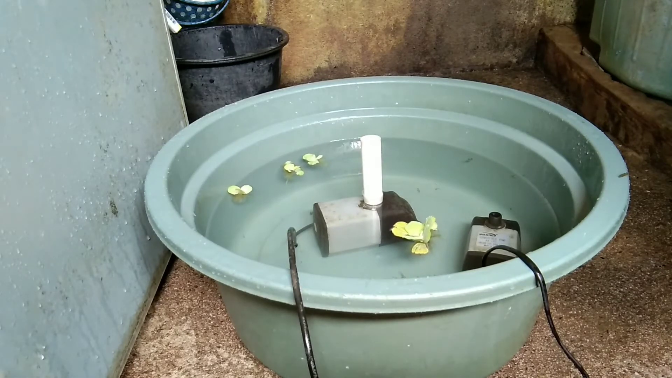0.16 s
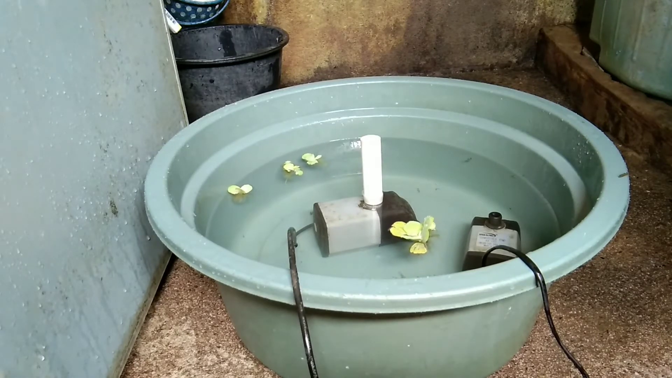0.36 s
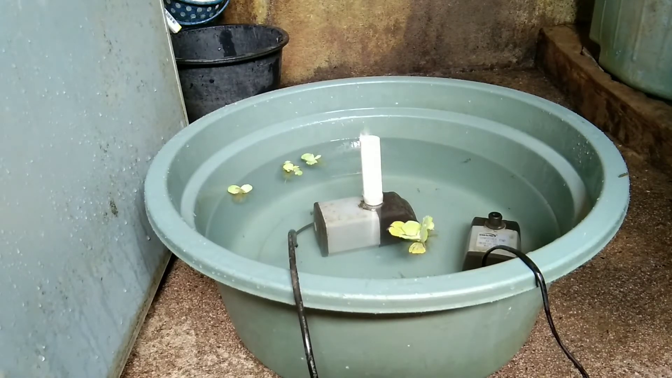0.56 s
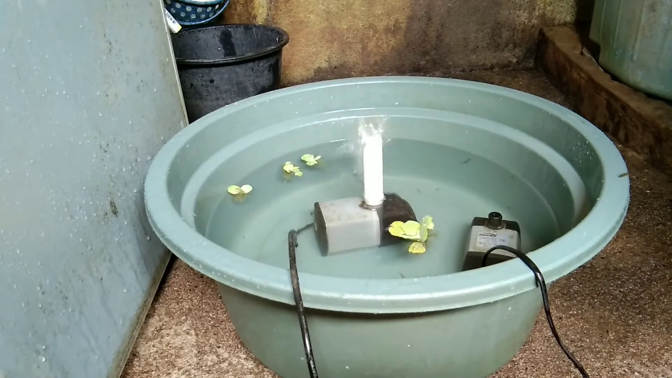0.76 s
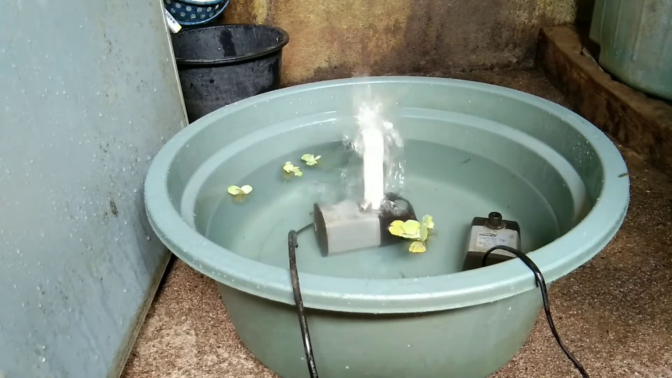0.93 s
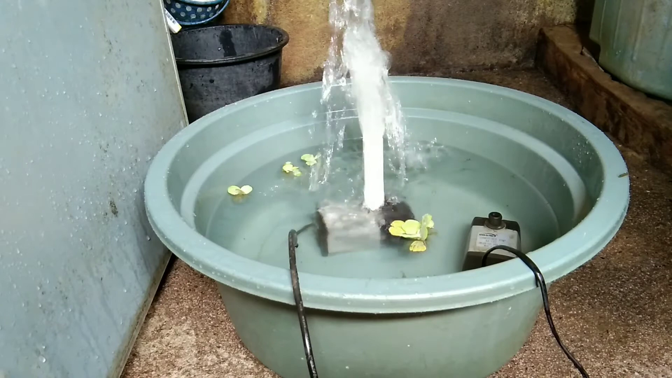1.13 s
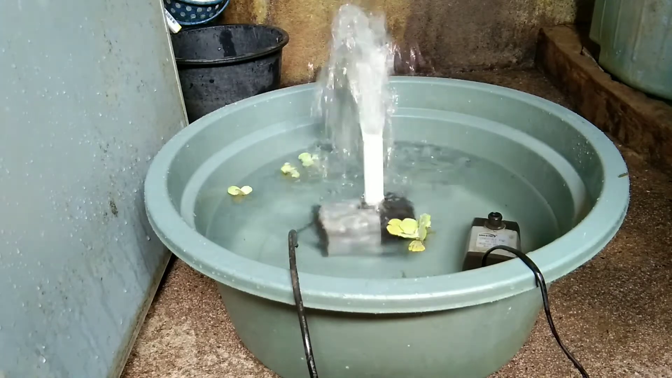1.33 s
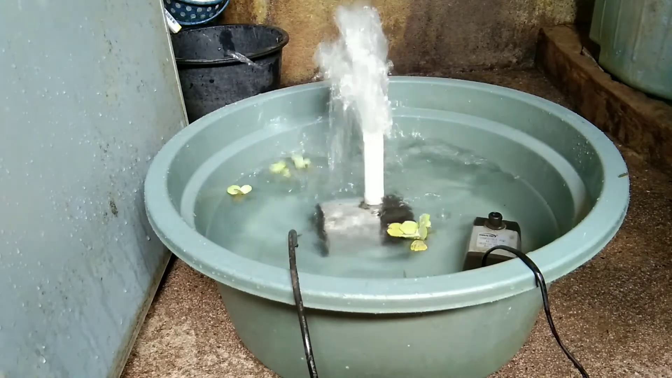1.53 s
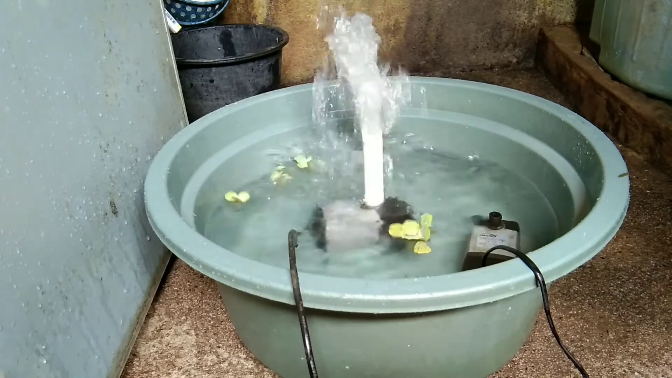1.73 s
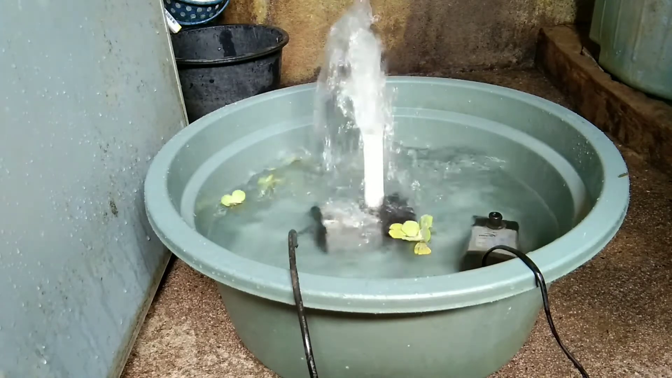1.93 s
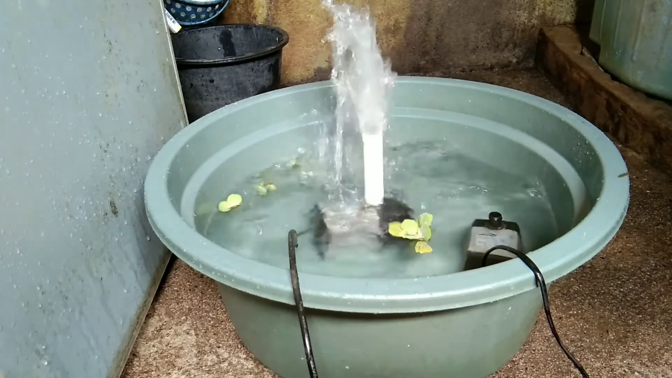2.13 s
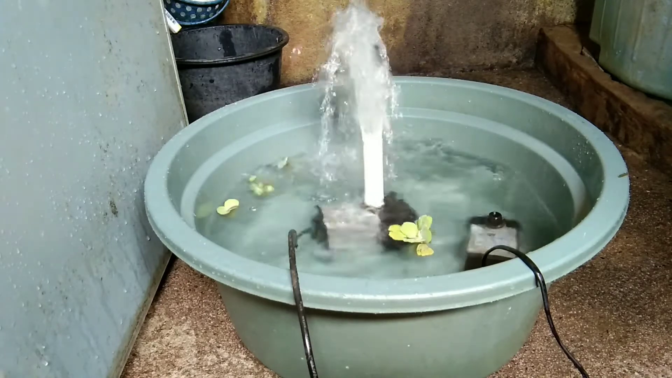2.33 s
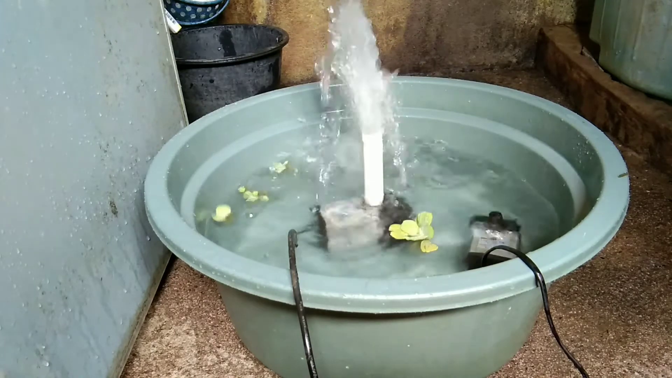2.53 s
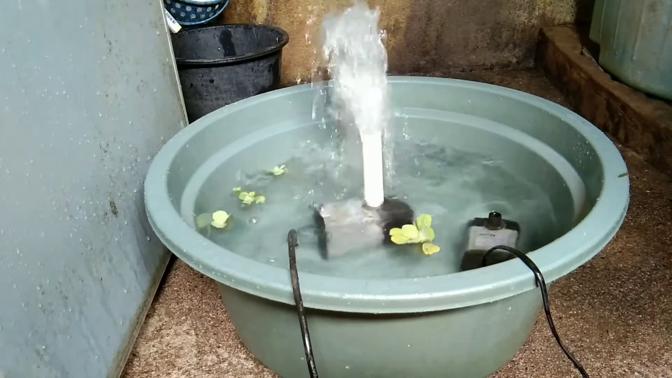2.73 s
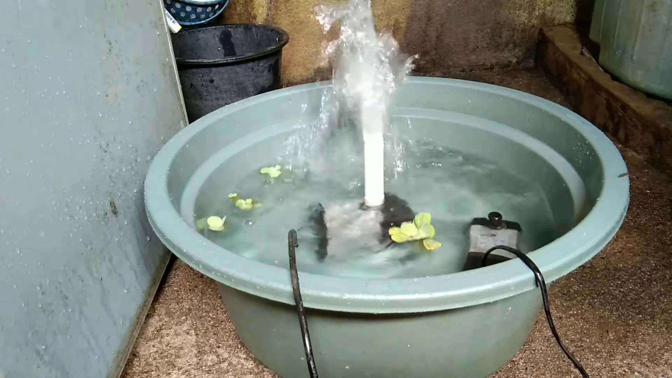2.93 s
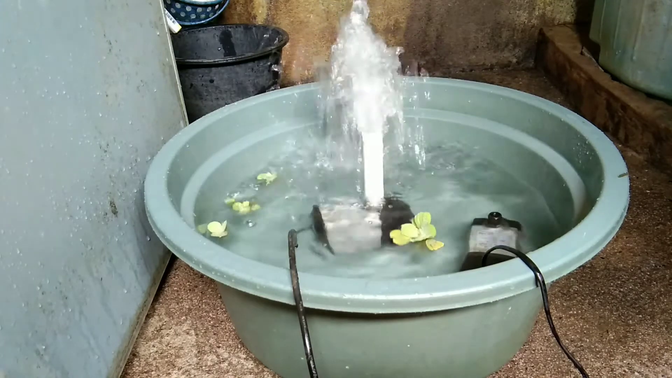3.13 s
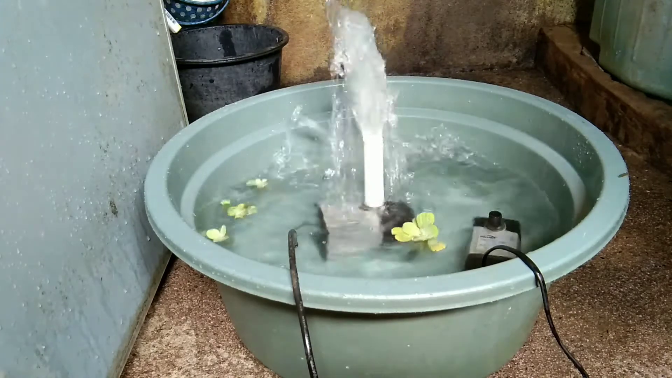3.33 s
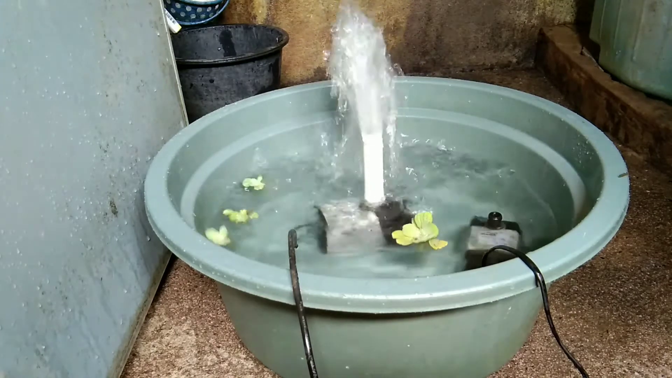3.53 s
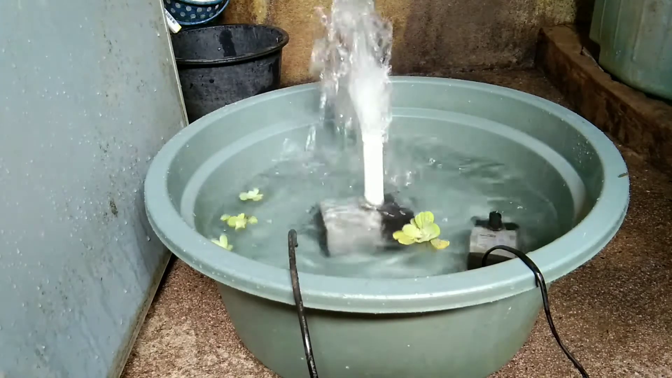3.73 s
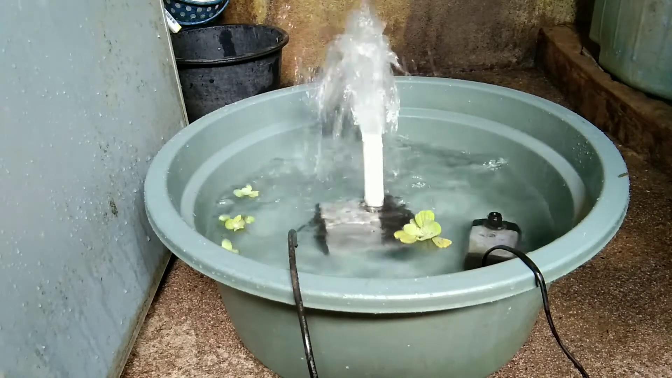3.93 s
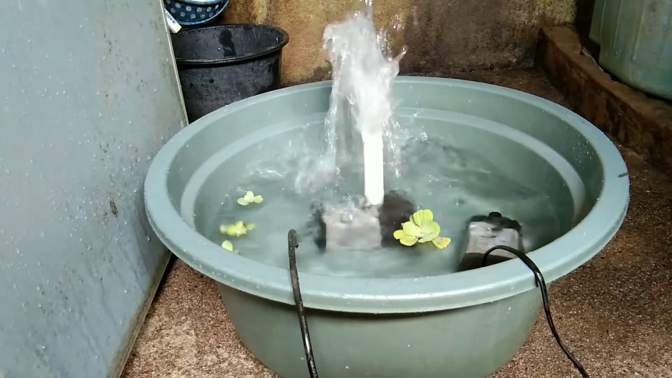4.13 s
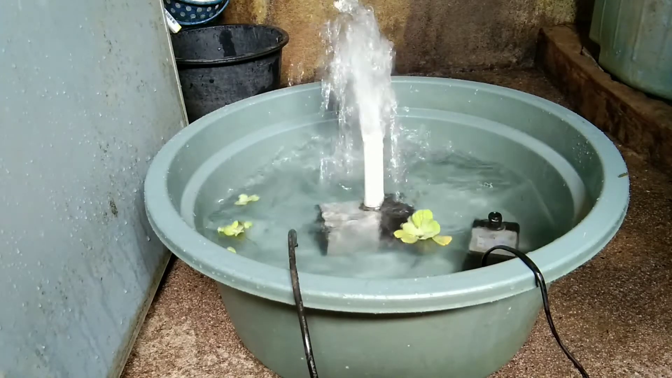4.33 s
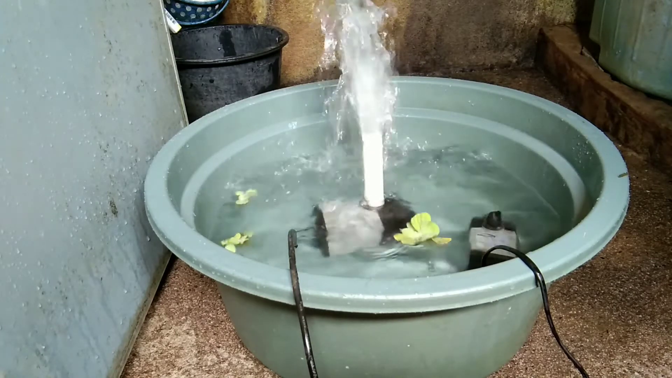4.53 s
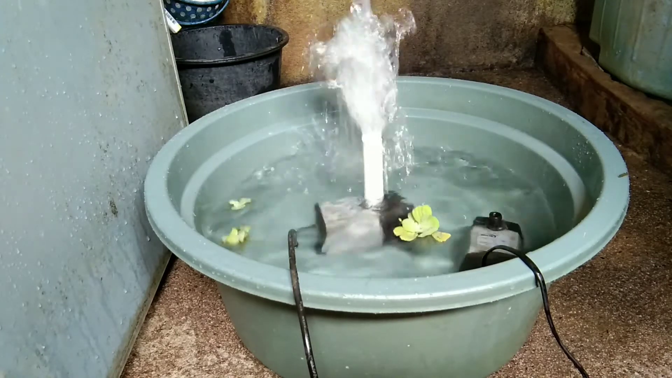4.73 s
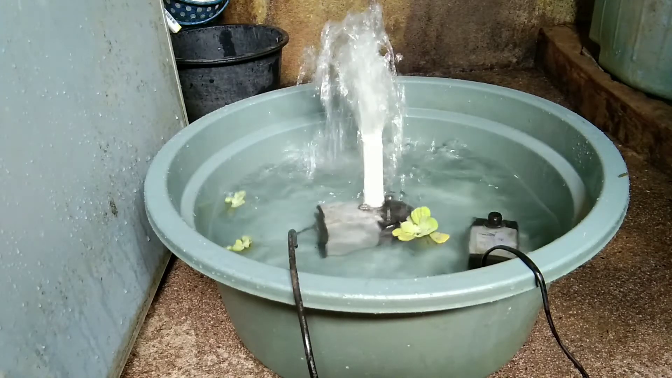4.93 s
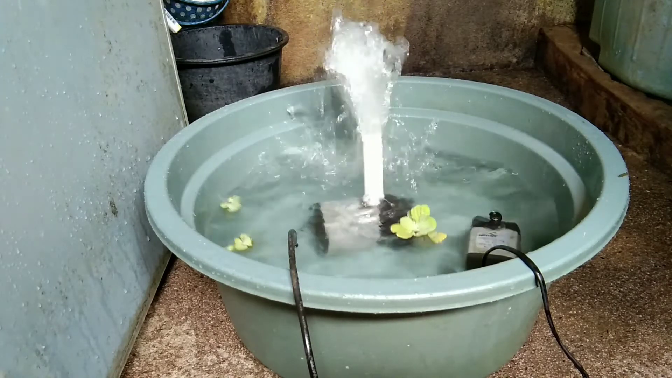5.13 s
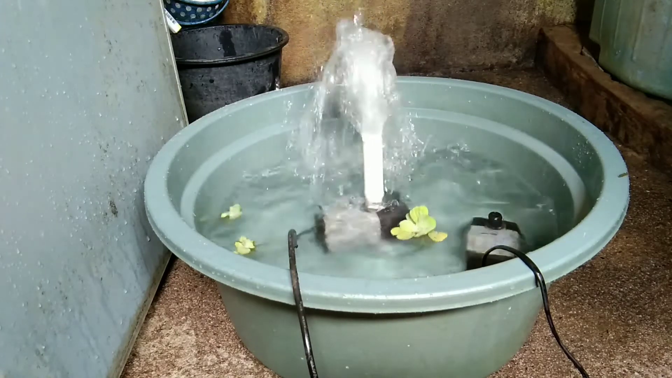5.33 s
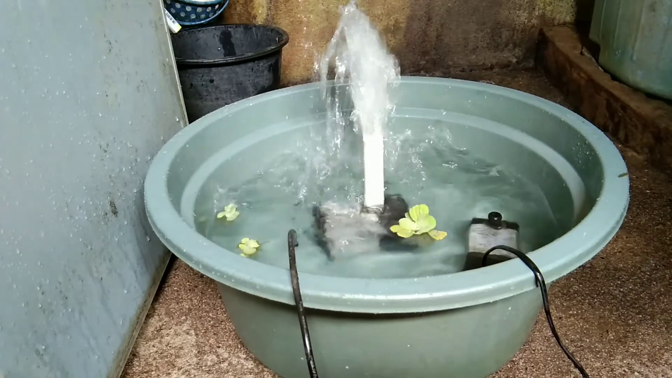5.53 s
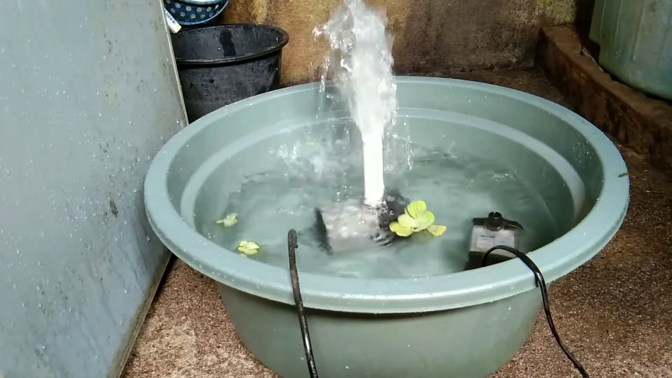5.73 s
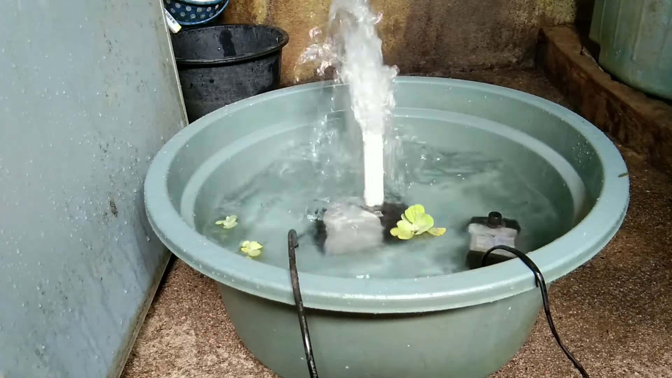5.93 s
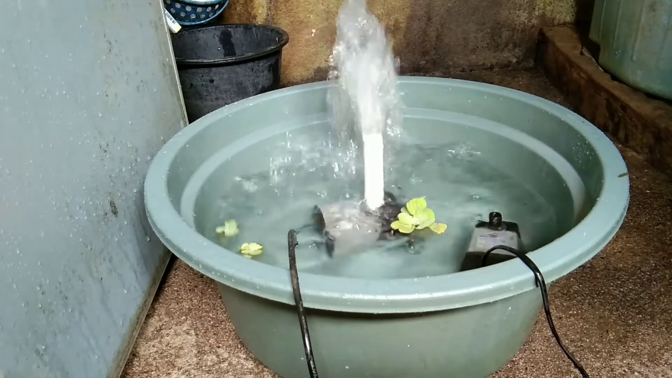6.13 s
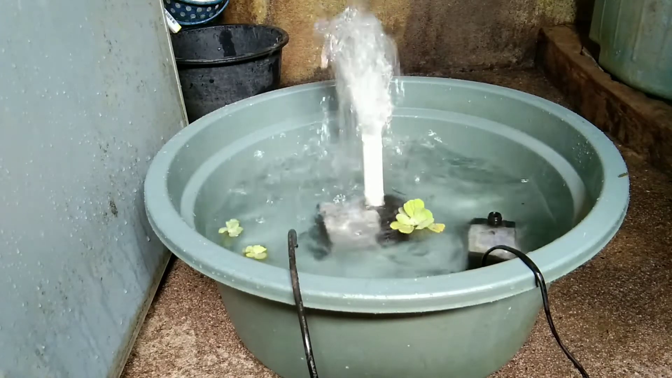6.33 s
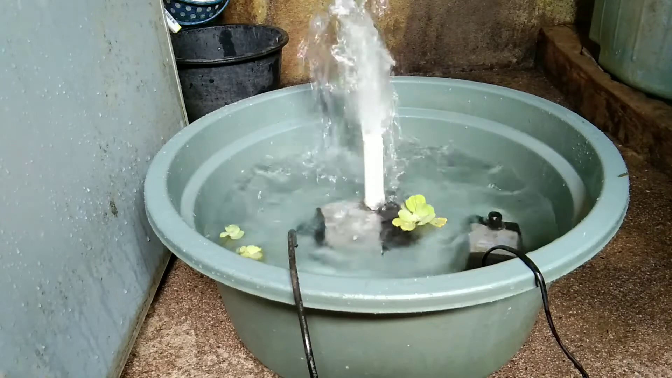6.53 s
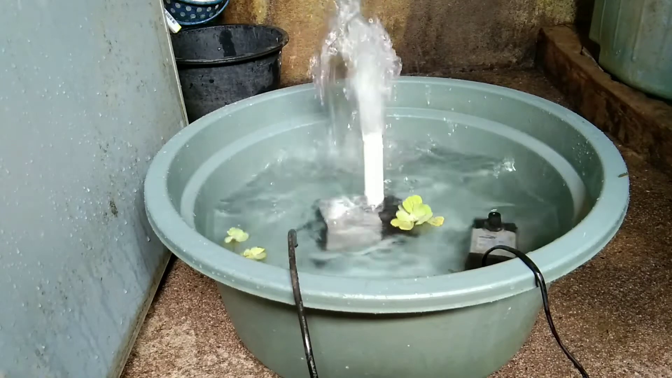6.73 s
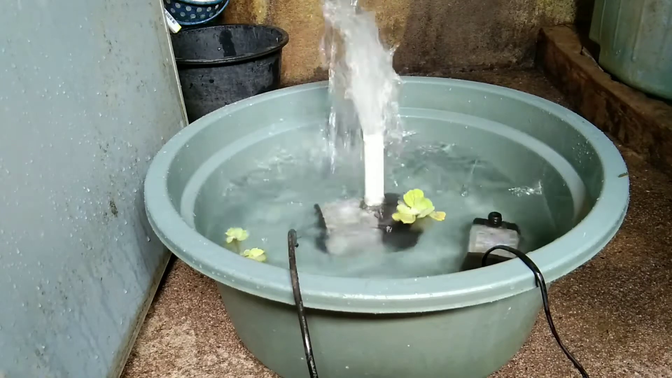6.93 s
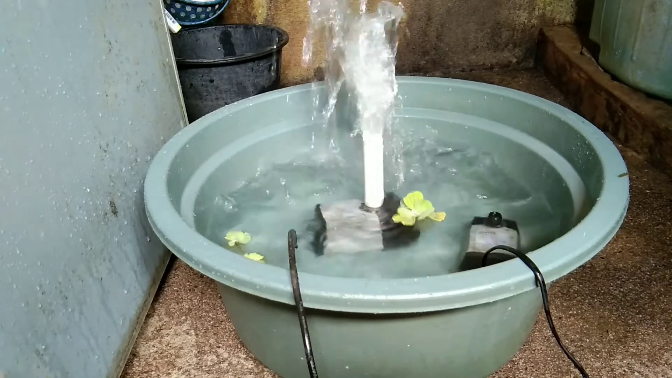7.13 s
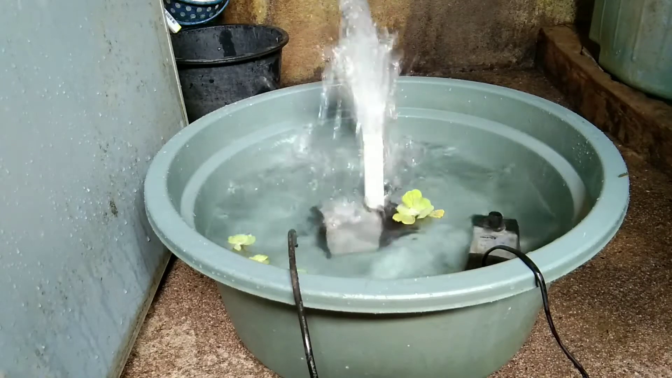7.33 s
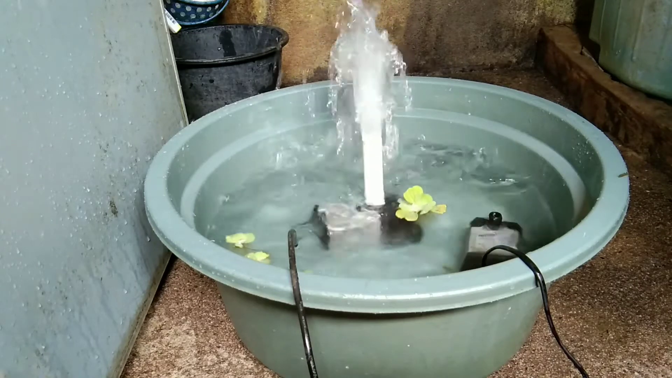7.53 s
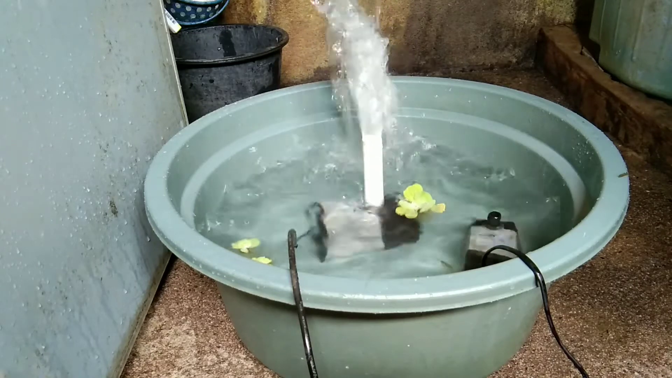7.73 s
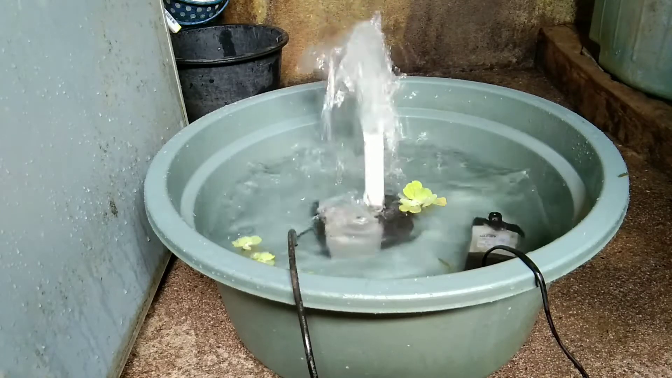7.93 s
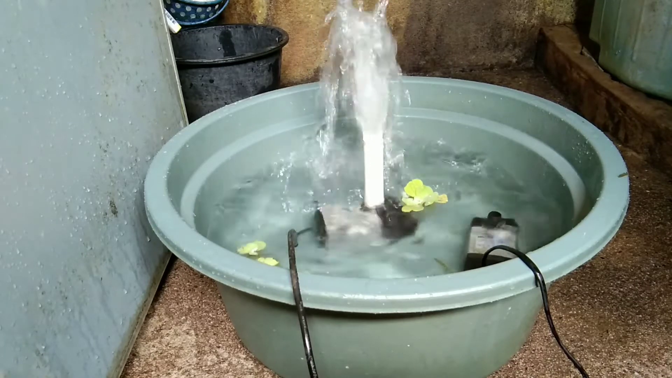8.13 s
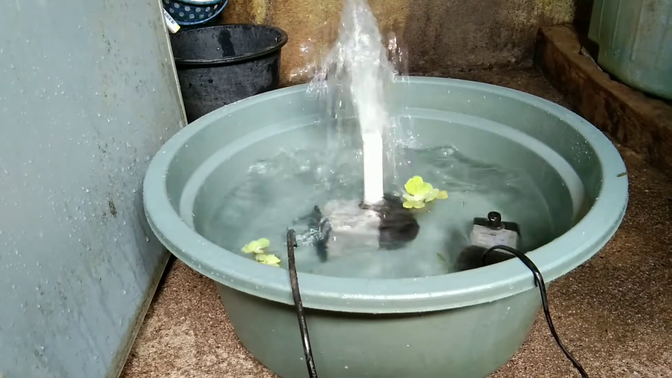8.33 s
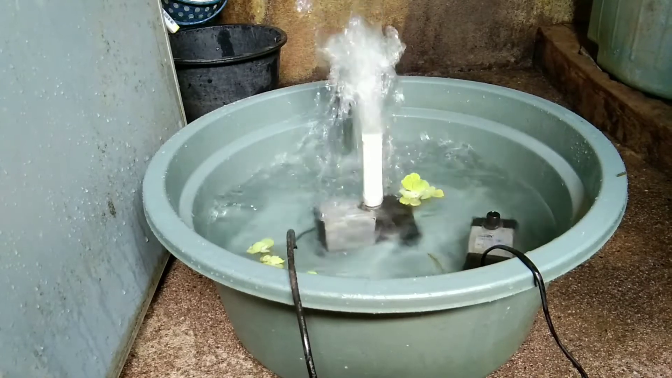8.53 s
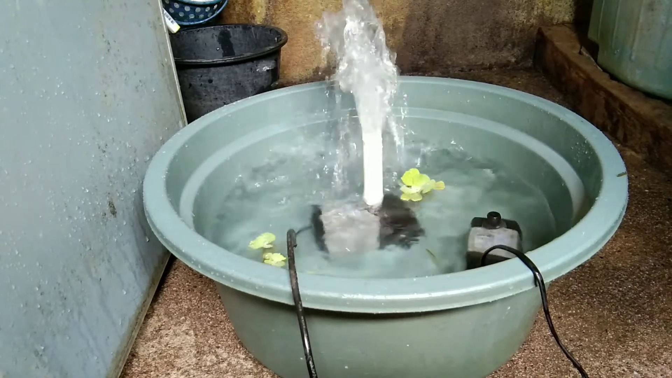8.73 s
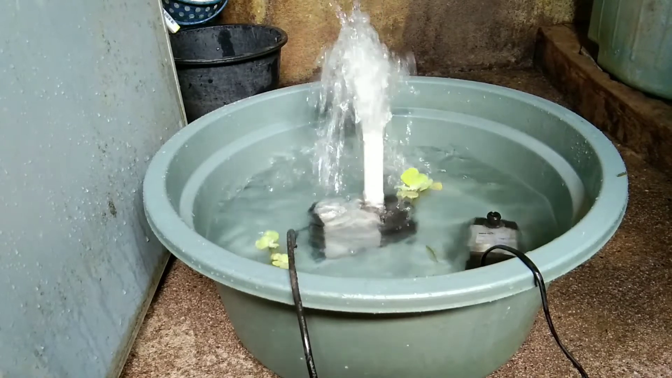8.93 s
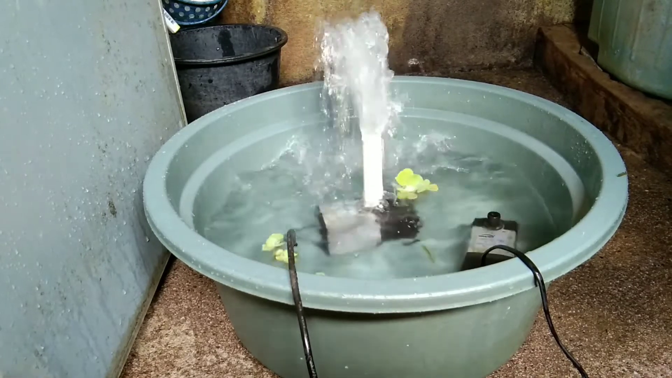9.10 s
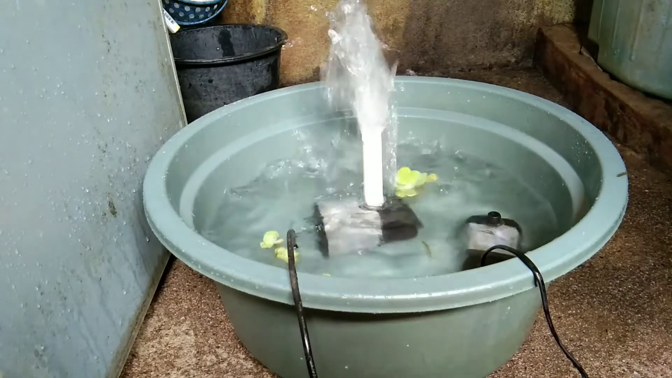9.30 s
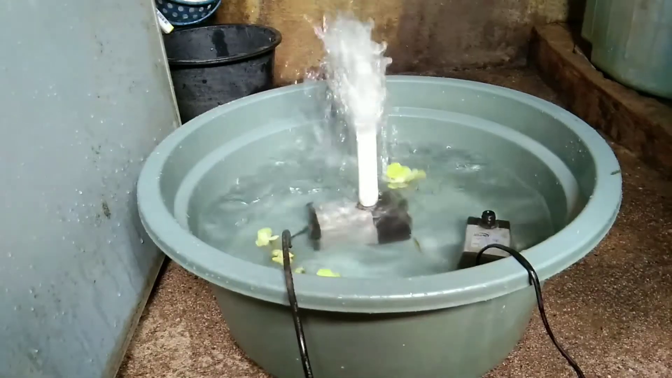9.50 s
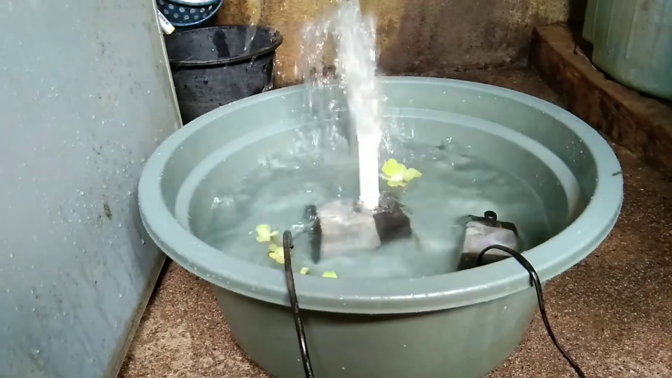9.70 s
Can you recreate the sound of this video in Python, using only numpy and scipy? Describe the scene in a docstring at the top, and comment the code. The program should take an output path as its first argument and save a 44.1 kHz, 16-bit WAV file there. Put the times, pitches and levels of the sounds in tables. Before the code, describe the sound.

After near silence, a small pump rattles and knocks in a plastic tub, then its jet splashes down steadily with splats, spray and bubbling until the end.

```python
"""Water thrown up by a small pump falls back into a plastic tub in clumps: spray, splats and bubbles.
Spray and churn are shaped noise plus swarms of tiny bubble rings; large drops and bubbles are placed singly.
The rotor knocks first, ringing tub and casing; hum and rumble rise under the water in a quiet yard.
Tones are narrow resonances of noise. One narrow-band microphone feeds two equal channels."""
import sys
import numpy as np
from scipy import signal
from scipy.fft import rfft, irfft, next_fast_len
from scipy.io import wavfile
from scipy.ndimage import uniform_filter1d

SR = 44100
rng = np.random.default_rng(int(sys.argv[2]) if len(sys.argv) > 2 else 0)


def dump_mix(stems):
    """Bounce the given channels to the path in sys.argv[1] as a 16-bit WAV at rate SR."""
    frames = np.atleast_2d(stems).T  # one column per channel
    limited = np.clip(frames, -1, 1)  # hard clip at full scale
    pcm = np.round(limited * 32767).astype(np.int16)
    wavfile.write(sys.argv[1], SR, pcm)


N = 430416

# steady rain of the jet: (time [s], spray level [dB], churn level [dB])
RAIN = [(0.86, -51.5, -41), (1.0, -47, -54), (1.1, -39, -57), (1.14, -36.5, -52), (1.3, -38, -61.5),
        (1.4, -38.5, -45), (9.76, -38, -46)]
# clumps of the jet crashing back: (time [s], spray level [dB], churn level [dB], time to fade 10 dB [s])
CLUMPS = [(1.364, -31, -50, 0.4153), (1.504, -24, -34.5, 0.0522), (1.593, -26.5, -50.5, 0.1003),
          (1.695, -29.5, -37, 0.2767), (1.874, -24.5, -40.5, 0.0565), (1.953, -27, -37, 0.2056),
          (2.066, -28, -41, 0.1463), (2.185, -27, -35, 0.1076), (2.295, -32.5, -42.5, 0.236),
          (2.416, -29.5, -45.5, 0.0585), (2.545, -26.5, -33.5, 0.0404), (2.615, -32, -38.5, 0.2361),
          (2.774, -28, -43.5, 0.0827), (2.84, -33, -41.5, 0.2634), (2.926, -31, -36.5, 0.1111),
          (2.984, -28, -38.5, 0.2543), (3.169, -30.5, -49, 0.4079), (3.254, -30.5, -34.5, 0.2142),
          (3.378, -21.5, -46.5, 0.057), (3.561, -33.5, -39, 0.1472), (3.624, -26, -33.5, 0.0181),
          (3.722, -23, -39.5, 0.0538), (3.806, -27.5, -45.5, 0.1753), (4.006, -29, -40.5, 0.43),
          (4.28, -21.5, -34, 0.0371), (4.337, -29.5, -39.5, 0.2797), (4.496, -27.5, -57, 0.0869),
          (4.595, -28, -38.5, 0.0798), (4.697, -29.5, -35.5, 0.1806), (4.844, -32, -37.5, 0.3218),
          (5.019, -24, -34.5, 0.0903), (5.112, -32, -53, 0.9972), (5.354, -32.5, -42, 0.4192),
          (5.5, -38.5, -48.5, 0.162), (5.656, -31.5, -39.0, 0.32), (5.875, -19.5, -40, 0.019),
          (5.977, -30.5, -38.5, 0.1819), (6.116, -30.5, -39.5, 0.2859), (6.341, -32.5, -45, 0.505),
          (6.475, -30, -38, 0.3143), (6.604, -34.5, -38.5, 0.144), (6.75, -34, -51.5, 0.7564),
          (6.852, -32, -34.5, 0.2203), (6.986, -31, -60, 0.3794), (7.141, -21.5, -48.5, 0.0176),
          (7.226, -26.5, -37, 0.1224), (7.328, -23, -34.5, 0.0545), (7.44, -28.5, -42.5, 0.0007),
          (7.605, -24, -36.5, 0.02), (7.674, -32, -38, 0.3279), (7.804, -34, -51.5, 0.657),
          (7.904, -37.5, -33.5, 0.0548), (7.984, -21, -34.5, 0.0142), (8.062, -27, -33.5, 0.149),
          (8.243, -24.5, -36, 0.105), (8.321, -24.5, -38.5, 0.06), (8.39, -29, -35, 0.1098),
          (8.47, -33.5, -41.5, 0.0154), (8.548, -32.5, -36, 0.0812), (8.637, -26, -46.5, 0.168),
          (8.777, -15.5, -35, 0.0208), (8.836, -28.5, -40.5, 0.0473), (8.923, -27.5, -42, 0.0698),
          (9.001, -27.5, -35, 0.2291), (9.273, -26.5, -41, 0.1574), (9.404, -31.5, -34, 0.1193),
          (9.509, -22, -28.5, 0.0483), (9.605, -30.5, -43, 0.3658)]
# spectrum of the spray: (frequency [Hz], relative density [dB per Hz])
SPRAY_SPECTRUM = [(530, -27.5), (900, -11), (1250, -6.5), (1840, -3.5), (3000, -1.5), (5180, 0.5),
                  (5710, 1.5), (6700, -0.5), (7600, 1), (9000, -23)]
# spectrum of the longer droplet rings: (frequency [Hz], relative density [dB per Hz])
PLINK_SPECTRUM = [(700, -30), (1000, -3), (1800, -2), (3200, -1.5), (4500, -30)]
# spectrum of the water under the surface: (frequency [Hz], relative density [dB per Hz])
CHURN_SPECTRUM = [(120, -39.5), (200, -11.5), (227, -4), (318, -9.5), (361, -0.5), (749, 1.5), (816, 1.5),
                  (986, -0.5), (2500, -11), (3250, -38), (5500, -120)]
# large drops hitting the surface: (time [s], level [dB], pitch [Hz])
SPLATS = [(0.067, -39, 1119), (0.222, -43, 1200), (0.326, -45, 1191), (0.349, -41, 1000),
          (0.403, -47.5, 4496), (0.977, -32, 3727), (1.005, -29, 4569), (1.012, -24.5, 6605),
          (1.048, -30.5, 4298), (1.083, -28, 5246), (1.118, -30, 2853), (1.1338, -24, 2566),
          (1.1731, -16, 5652), (1.2272, -21, 3764), (1.268, -21, 3651), (1.289, -12.5, 5887),
          (1.3497, -15.5, 4187), (1.366, -19, 2009), (1.372, -9.5, 1541), (1.3735, -16, 5300),
          (1.4065, -25, 3185), (1.4265, -21, 4531), (1.6011, -17.5, 5877), (1.7461, -11.5, 3317),
          (1.8164, -19, 4281), (1.9768, -16, 5300), (2.0508, -18.5, 2774), (2.0937, -10.5, 5382),
          (2.225, -19, 5899), (2.2486, -23.5, 5800), (2.3046, -20.5, 4355), (2.3621, -24.5, 5431),
          (2.4316, -18, 6134), (2.447, -18.5, 6164), (2.553, -16.5, 5928), (2.6405, -17.5, 3486),
          (2.7875, -20, 2802), (2.8554, -21, 5668), (2.8636, -19, 5854), (2.9693, -23, 3450),
          (3.013, -13, 5844), (3.1387, -21, 4310), (3.2039, -15, 5586), (3.3138, -16.5, 2675),
          (3.384, -20.5, 5800), (3.5245, -19, 3528), (3.5703, -14.5, 2831), (3.6394, -13.5, 1720),
          (3.656, -17.5, 5445), (3.733, -13, 4818), (3.759, -17, 2366), (3.824, -14, 5886),
          (3.8554, -13, 4145), (3.8727, -14, 4707), (3.986, -15, 4600), (4.0362, -12.5, 6271),
          (4.0492, -11.5, 4108), (4.0543, -9.5, 3258), (4.231, -12, 2314), (4.281, -15, 1834),
          (4.2953, -14.5, 3091), (4.309, -13, 4040), (4.348, -18, 1781), (4.401, -16.5, 4165),
          (4.455, -19.5, 3510), (4.503, -19, 1414), (4.511, -18.5, 4403), (4.5274, -20.5, 4332),
          (4.5976, -13.5, 6325), (4.606, -15, 5178), (4.7123, -18, 5922), (4.7403, -18, 2519),
          (4.792, -17, 4508), (4.9308, -15, 3320), (5.284, -19, 2798), (5.428, -15, 2917),
          (5.5231, -10.5, 4585), (5.6021, -17.5, 4363), (5.6662, -19.5, 2760), (5.676, -20.5, 1870),
          (5.723, -16, 3547), (5.7614, -18.5, 2214), (5.977, -22, 5065), (6.006, -20.5, 4075),
          (6.123, -18.5, 2903), (6.143, -17.5, 4470), (6.179, -17.5, 5796), (6.186, -20, 6119),
          (6.208, -17, 4325), (6.3528, -16.5, 5123), (6.454, -19, 5560), (6.4768, -13.5, 4091),
          (6.5103, -20.5, 3130), (6.549, -13.5, 4937), (6.6289, -17, 3362), (6.6407, -16.5, 5034),
          (6.6667, -21, 4881), (6.7858, -20.5, 1608), (6.9072, -15.5, 4078), (6.9345, -19.5, 4724),
          (7.0219, -17.5, 6263), (7.152, -18, 3004), (7.247, -16, 4265), (7.295, -17, 3030),
          (7.352, -15, 3013), (7.4863, -17, 3506), (7.5321, -19.5, 4436), (7.626, -15, 5452),
          (7.6981, -17.5, 1303), (7.705, -17.5, 4858), (7.752, -20, 6283), (7.8073, -20.5, 2668),
          (7.8299, -15.5, 5549), (7.913, -10.5, 4143), (7.9945, -19.5, 2180), (8.0005, -12.5, 2360),
          (8.071, -11.5, 4600), (8.094, -14, 4500), (8.194, -18, 4026), (8.271, -15, 1720),
          (8.299, -19, 2596), (8.347, -20, 4973), (8.406, -18.5, 5578), (8.5673, -19, 3147),
          (8.6685, -17.5, 5857), (8.678, -16.5, 4293), (8.7863, -15, 6298), (8.9358, -15, 2514),
          (9.0235, -11, 5671), (9.0238, -16, 2422), (9.0479, -20.5, 2316), (9.0573, -18.5, 4956),
          (9.089, -18.5, 6275), (9.1584, -19.5, 6196), (9.2796, -18.5, 5406), (9.281, -18, 3270),
          (9.3065, -11.5, 5289), (9.3456, -16.5, 4823), (9.4148, -18.5, 6445), (9.509, -19, 5699),
          (9.5299, -15, 1697), (9.531, -16, 4744), (9.547, -18, 1770), (9.5535, -17, 1750),
          (9.6486, -15, 2386), (9.649, -17.5, 6408)]
# large trapped bubbles: (time [s], level [dB], pitch [Hz])
GLUGS = [(0.35, -49.5, 804.2), (1.001, -29, 1480), (1.133, -32, 1030), (1.373, -31, 1513),
         (1.33, -37, 995.5), (1.437, -29.5, 357.1), (1.459, -29, 679.7), (1.48, -26.5, 703.4),
         (1.51, -22, 1882), (1.526, -23.5, 365), (1.535, -26.5, 979.8), (1.585, -34.5, 371.6),
         (1.6, -29, 1820), (1.695, -23.5, 1798), (1.716, -24, 1411), (1.745, -33, 625.4),
         (1.82, -22.5, 1029), (1.822, -28.5, 752.7), (1.973, -26.5, 1045), (1.97, -27.5, 724.7),
         (2.067, -26, 443), (2.164, -31.5, 1188), (2.192, -32.5, 272), (2.357, -26, 1714),
         (2.561, -32.5, 276.9), (2.639, -32, 427.5), (3.05, -27.5, 1714), (3.311, -29.5, 521.6),
         (3.314, -28, 801.3), (3.395, -29, 880.5), (3.482, -31, 1039), (3.585, -29.5, 824.4),
         (3.834, -27, 393), (3.844, -25.5, 2155), (4.052, -30, 750.7), (4.067, -31.5, 364.9),
         (4.118, -32, 1964), (4.161, -31, 1626), (4.362, -19, 1828), (4.566, -31, 399.3),
         (4.626, -26, 354.1), (4.717, -33, 1836), (4.743, -32, 1842), (4.763, -27, 650.8),
         (4.853, -30, 790), (4.87, -31.5, 594.2), (4.906, -32, 800), (4.939, -29, 805.4),
         (4.955, -31, 910.8), (5.014, -22, 383.8), (5.018, -25, 1862), (5.034, -24.5, 391),
         (5.06, -30, 394.2), (5.079, -29, 1003), (5.119, -27.5, 875), (5.13, -26.5, 1292),
         (5.15, -27.5, 1416), (5.272, -28.5, 369.5), (5.413, -26.5, 832.8), (5.426, -26.5, 1814),
         (5.6, -26.5, 691.7), (5.69, -21.5, 1869), (5.733, -28, 447), (5.853, -27.5, 801),
         (6.005, -28.5, 849.8), (6.138, -28, 378.5), (6.273, -27.5, 1113), (6.447, -28, 500.7),
         (6.599, -21.5, 910.7), (6.723, -28, 362.3), (6.733, -27.5, 2295), (6.826, -30, 1115),
         (6.86, -22, 429.7), (6.905, -26.5, 1037), (6.908, -31.5, 399.7), (6.928, -30, 616.8),
         (6.948, -31, 412.2), (6.971, -24, 1572), (6.998, -25.5, 917.3), (7.016, -26, 924.3),
         (7.26, -28, 2053), (7.374, -29, 661.6), (7.625, -28.5, 920.6), (7.687, -34.5, 492.5),
         (7.694, -22, 1140), (7.919, -29, 602.4), (7.974, -32.5, 1148), (8.09, -30, 666.4),
         (8.105, -30, 1097), (8.14, -32, 672.7), (8.157, -29.5, 398.3), (8.248, -29, 645.6),
         (8.264, -32, 678), (8.408, -29.5, 815.5), (8.79, -25.5, 900), (8.8, -32, 600.4),
         (9.004, -28.5, 644.4), (9.024, -26, 653.2), (9.059, -23.5, 653.4), (9.281, -25.5, 1048),
         (9.4, -28, 1078), (9.528, -26.5, 1406), (9.692, -34, 641.2)]
# standing waves of the water-filled tub: (frequency [Hz], width [Hz], gain [dB])
BASIN_MODES = [(365, 27, 8), (406.47, 17, 4), (473.76, 14, 1.5), (670.77, 17, 5.5), (800, 31, 3.5),
               (1007.9, 8.1, -6), (1720, 17, 2.5), (1814, 24, 2.5), (2171.5, 19, 3.5)]
# rotor knocks before it catches: (time [s], thud peak [dB], scrape peak [dB], casing clack peak [dB])
KNOCKS = [(0.446, -42.5, -28, -38), (0.484, -38, -27.5, -37.5), (0.5116, -18.5, -25.5, -24.5),
          (0.541, -18.5, -28, -26.5), (0.573, -21.5, -27.5, -27.5), (0.6215, -18, -23.5, -24.5),
          (0.682, -19, -28.5, -33), (0.717, -31, -25.5, -43), (0.735, -25, -29, -31),
          (0.744, -27.5, -30, -31), (0.807, -21.5, -27, -33), (0.829, -27.5, -23.5, -27.5),
          (0.862, -32.5, -27, -44.5), (0.92, -41.5, -32, -39.5), (0.927, -38, -24.5, -44),
          (0.967, -43.5, -42, -51)]
# ringing modes of the tub: (frequency [Hz], relative level [dB], t60 [s])
TUB_MODES = [(195.31, -4, 0.1736), (237.8, -17.5, .1), (293.7, -11, 0.16), (365, -9, 0.13),
             (413.13, -16.5, 0.17), (436.24, -16, 0.13), (471.24, -6.5, 0.2183), (508.8, -13.5, 0.13),
             (551.97, -11.5, .12), (609.2, -3.5, 0.23), (651.5, -6.5, .15), (677.75, -4, .2),
             (692.68, -2, 0.1882), (790, -15.5, .03), (900, -4.5, 0.023), (1069.1, 2, 0.02426),
             (1163.3, -1.5, .025), (1256.7, -1.5, 0.051), (1441.4, -5, .025), (1634, -11, 0.033)]
# ringing modes of the pump casing: (frequency [Hz], relative level [dB], t60 [s])
CASING_MODES = [(3320, 2, 0.01549), (4600, -15, .01), (5300, -13.5, .012), (6393.3, -11, .013)]
# pump tones: (frequency [Hz], width [Hz], relative level [dB], steady part against wavering part [ratio])
HUM_TONES = [(100.8, 4.3, -56.5, 1.2), (128.46, 9, -56.5, 0.37), (64.915, 10, -66.5, .1),
             (167.12, 9, -62.5, .1), (199.4, 6.4, -58, .4), (287.58, 11, -66, .1)]
# gain of all pump noise: (time [s], gain [dB])
PUMP_RISE = [(.45, -29), (1.0, -1.5), (2.5, -1.5), (5, 0.5), (8.5, 2.5), (9.76, 3.5)]
# spectrum of the pump rumble: (frequency [Hz], relative density [dB per Hz])
RUMBLE_SPECTRUM = [(15, -50.5), (25, -19), (107, 2), (197, 5), (241, -14.5), (306, -13), (330, -4.5),
                   (430, -38.5), (730, -120)]
# spectrum of the yard hiss: (frequency [Hz], relative density [dB per Hz])
YARD_SPECTRUM = [(18, -60), (30, -23.5), (42, -18.5), (57, -7), (80, -1), (130, -1.5), (205, -13.5),
                 (300, -15), (490, -16), (610, -20.5), (720, -19), (820, -8.5), (930, -16.5), (1600, -22.5),
                 (1850, -19), (3660, -25), (5960, -21), (7700, -39.5), (10000, -75)]
# insect tone: (frequency [Hz], width [Hz], level [dB])
INSECT_TONE = (6000, 30, -71.5)
# microphone response: (frequency [Hz], gain [dB])
MIC_RESPONSE = [(10, -23), (30, -9), (48, -10), (65, -3.5), (6600, 0), (7000, -4.5), (7400, -15.5),
                (7800, -38), (22050, -51.5)]

CLUMP_RISE_S, SPLAT_T60_S, KNOCK_RISE_S = 0.016478, 0.012817, 0.00326
GLUG_T60_AT_1KHZ_S, GLUG_SIZE_LAW, GLUG_HOLD = 0.07, 0.55, 1.1765  # lower-pitched bubbles ring longer
RUMBLE_DB, YARD_DB = -58.5, -55  # rumble level also follows PUMP_RISE
MIC_EDGE_HZ = 7900


def falling(column):
    """Level of landing water: rain and clumps add in power; each clump rises fast, fades at its own pace."""
    power = amp(curve(RAIN, column)) ** 2
    t = np.arange(SR) / SR
    for row in CLUMPS:
        start_s, level_db, fade_s = row[0], row[column], row[3]
        level = amp(level_db - 10 * t / fade_s) * (1 - np.exp(-t / CLUMP_RISE_S))
        add(power, start_s, level ** 2)
    return np.sqrt(power)


def spray():
    """Fine fizz, dry ticks, droplet rings and longer plinks where the jet rains down."""
    fizz = amp(-5) * hiss(SPRAY_SPECTRUM, 3.19, 0.9)
    rings = amp(-3.5) * swarm(SPRAY_SPECTRUM, 2000, 30, 3.1107, 0.12, count=48)
    ticks = amp(-10.0) * swarm(SPRAY_SPECTRUM, 1100, 7, 3.8, 0.1, count=12)
    plinks = amp(-10.0) * swarm(PLINK_SPECTRUM, 260, 65, 2.538, 0.05, count=48)
    return falling(column=1) * (fizz + rings + ticks + plinks)


def churn():
    """Lower wash and crowded gurgling bubbles under the surface."""
    wash = amp(-6) * hiss(CHURN_SPECTRUM, 2.8, 1.0, size=1024)
    gurgle = amp(-2.5) * swarm(CHURN_SPECTRUM, 700, 32, 2.608, 0.14768, count=48)
    return falling(column=2) * (wash + gurgle)


def splats():
    """Each large drop: a wide noise snap, a fading spatter and two short bubble rings."""
    out = np.zeros(N)
    t = np.arange(3000) / SR
    noise = rng.standard_normal((len(SPLATS), len(t)))
    upper_ratio = rng.uniform(0.85, 1.095, len(SPLATS))
    snap = 0.9134 * (1 - np.exp(-t / 0.0011186)) ** 2 * amp(-60 * t / 0.01328)
    spatter = 0.07331 * amp(-60 * t / 0.21)
    for (s, db, hz), n, ratio in zip(SPLATS, noise, upper_ratio):
        band_hz = [0.55 * hz, min(1.5 * hz, 12000)]
        band = signal.lfilter(*signal.butter(1, band_hz, "band", fs=SR), n)
        add(out, s, amp(db) * evened(band) * (snap + spatter))
        add(out, s, amp(db - 1.5) * bubble(hz, SPLAT_T60_S, 0.092, swell=0.22))
        add(out, s, amp(db - 2.0) * bubble(ratio * hz, SPLAT_T60_S, 0.17, swell=0.18))
    return out


def glugs():
    """Big bubbles pulled under by falling water: the ring, a wide plop, and neighbours breaking off."""
    out = np.zeros(N)
    for (s, db, hz), (late, size) in zip(GLUGS, rng.random((len(GLUGS), 2, 3))):
        t60 = GLUG_T60_AT_1KHZ_S * (1000 / hz) ** GLUG_SIZE_LAW
        add(out, s, amp(db - 4) * bubble(hz, t60, 0.035, swell=0.9, hold=GLUG_HOLD))
        add(out, s, amp(db - 8) * bubble(1.3 * hz, 6 / hz, -0.1, swell=2.5))
        for wait, ratio in zip(late, size):
            neighbour = bubble((0.82 + 0.4 * ratio) * hz, 0.7 * t60, 0.048, swell=0.94)
            add(out, s + 0.45 * t60 * wait, amp(db - 11.0) * neighbour)
    return out


def basin(x):
    """Standing waves of the tub, as resonant gains in dB, colour the spray and churn."""
    def gain_db(f):
        return sum(db / (1 + (2 * (f - hz) / width) ** 2) for hz, width, db in BASIN_MODES)
    return coloured(x, gain_db)


def walls(x):
    """Sparse fading echoes from tub rim and near walls, duller than the direct sound."""
    taps = np.zeros(8000)
    at = np.arange(100, 7980, 20) + rng.integers(0, 20, 394)
    taps[at] = rng.choice([-1., 1.], 394) * amp(-60 * at / SR / 0.34406)
    taps = signal.lfilter(*signal.butter(1, 2500, fs=SR), taps / np.linalg.norm(taps))
    return signal.oaconvolve(x, taps)[:N]


def knocks():
    """Each knock: a short noise jolt rings the tub, a scrape, and a tap rings the pump casing."""
    out = np.zeros(N)
    t = np.arange(8000) / SR
    noise = rng.standard_normal((len(KNOCKS), 3, len(t)))
    tub = ringing(TUB_MODES, t)
    tub = signal.lfilter(*signal.butter(4, 160, "high", fs=SR), tub)  # the thin wall radiates no deep bass
    casing = ringing(CASING_MODES, t)
    rise = (1 - np.exp(-t / KNOCK_RISE_S)) ** 2
    jolt_env = rise * (amp(-60 * t / 0.017374) + 0.09072 * amp(-60 * t / 0.25976))
    tap_env = rise * amp(-60 * t / 0.01439)
    scrape_fade = amp(-60 * t / 0.01935) + 0.25605 * amp(-60 * t / 0.4368)
    scrape_env = (1 - np.exp(-t / 0.0008988)) * scrape_fade
    for (s, thud_db, scrape_db, clack_db), (jolt, rub, tap) in zip(KNOCKS, noise):
        thud = signal.fftconvolve(tub, jolt * jolt_env)
        clack = signal.fftconvolve(casing, tap * tap_env)
        scrape = signal.lfilter(*signal.butter(1, [1100, 7500], "band", fs=SR), rub) * scrape_env
        for db, part in ((thud_db, thud), (scrape_db, scrape), (clack_db, clack)):
            add(out, s, amp(db) * part / abs(part).max())
    return out


def pump():
    """Mains hum and motor drone carried by the tub, over a low noise rumble."""
    drone = sum(amp(db) * whistle(hz, width, steady) for hz, width, db, steady in HUM_TONES)
    rumble = amp(RUMBLE_DB) * hiss(RUMBLE_SPECTRUM, 0.9998, 0.3, size=4096)
    return amp(curve(PUMP_RISE, 1)) * (drone + rumble)


def yard():
    """Distant outdoor hiss with a thin insect tone."""
    hz, width, db = INSECT_TONE
    air = amp(YARD_DB) * hiss(YARD_SPECTRUM, 1.8, 0.48, size=2048)
    return air + amp(db) * whistle(hz, width)


def bubble(hz, t60, rise, swell=1.9, hold=1):
    """A decaying ring with gliding pitch (up if rise > 0); swell sets its onset, hold delays the fade."""
    t = np.arange(round(t60 * SR) + 8) / SR
    envelope = (1 - np.exp(-t * hz * swell)) * amp(-60 * (t / t60) ** hold)
    return envelope * np.sin(2 * np.pi * hz * t * (1 + rise * t / t60))


def swarm(spectrum, per_s, cycles, spread_db, rise, count=24):
    """Random bubbles of count pitches, each lasting some cycles; most are faint, a few large."""
    size = amp(spread_db * np.minimum(rng.exponential(1, N), 4.2))
    size = size * (rng.random(N) < per_s / SR)
    kind = rng.integers(0, count, N)
    out = np.zeros(N)
    # pitches avoid the outermost spectrum points
    for k, hz in enumerate(np.geomspace(spectrum[1][0], spectrum[-2][0], count)):
        grain = bubble(hz, cycles / hz, rise)
        # sqrt(hz): log-spaced pitches cover bands that widen with hz
        grain = grain / np.linalg.norm(grain) * amp(read(spectrum, hz)) * np.sqrt(hz)
        out += signal.oaconvolve(size * (kind == k), grain)[:N]
    return evened(out)


def hiss(spectrum, patchy_db, flicker_db, size=512):
    """Noise whose short-time spectrum has drifting patches and flicker shared by all bands."""
    frames, hz = 4 * N // size + 5, np.fft.rfftfreq(size, 1 / SR)
    a, b, patches = rng.standard_normal((frames, len(hz), 3)).T
    patches = uniform_filter1d(patches, size=7, axis=0)  # across bands
    patches = evened(uniform_filter1d(patches, size=10, axis=1))  # across frames
    flicker = evened(uniform_filter1d(rng.standard_normal(frames), size=3))
    level_db = read(spectrum, hz)[:, None] + patchy_db * patches + flicker_db * flicker
    z = (a + 1j * b) * amp(level_db)
    return evened(signal.istft(z, nperseg=size, noverlap=3 * size // 4)[1][:N])


def whistle(hz, width, steady=0.):
    """A wavering tone: noise in a narrow resonance, with a steady share."""
    r = np.exp(-np.pi * width / SR)
    waver = signal.lfilter([np.sqrt(1 - r * r)], [1, -r], rng.standard_normal((2, N)))
    slow = evened(steady + waver)
    phase = 2 * np.pi * hz * np.arange(N) / SR
    return evened(slow[0] * np.cos(phase) + slow[1] * np.sin(phase))


def ringing(modes, t):
    """Impulse response of a body: a sum of decaying sine modes."""
    return sum(amp(db - 60 * t / t60) * np.sin(2 * np.pi * hz * t) for hz, db, t60 in modes)


def coloured(x, gain_db):
    """Filters by a dB function of frequency."""
    size = next_fast_len(N + 4096)
    gain = amp(gain_db(np.fft.rfftfreq(size, 1 / SR)))
    return irfft(rfft(x, size) * gain, size)[..., :N]


def amp(db):
    """Gain from dB."""
    return 10 ** (np.asarray(db) / 20)


def evened(x):
    """Scales to rms 1."""
    return x / np.sqrt(np.mean(x ** 2) + 1e-20)


def read(points, hz):
    """Reads a spectrum on a log-frequency axis."""
    f, value = np.transpose(points)
    return np.interp(np.log(hz + 1), np.log(f + 1), value)


def curve(rows, column):
    """One column of a table at every sample."""
    rows = np.array(rows)
    return np.interp(np.arange(N) / SR, rows[:, 0], rows[:, column])


def add(mix, s, sound):
    """Lays a sound into the mix at s seconds."""
    part = mix[round(s * SR):][:len(sound)]
    part += sound[:len(part)]


def scene():
    """All sources in two equal channels; spray and churn fade in as the jet starts landing."""
    landed = np.clip((np.arange(N) / SR - RAIN[0][0]) / 0.033, 0, 1)
    water = basin(landed * (spray() + churn())) + splats() + glugs()
    mono = water + amp(-5.0) * walls(water) + knocks() + pump() + yard()
    return np.array([mono, mono])


def record(dry):
    """The microphone loses the lowest bass and the top treble, then a steep band limit."""
    heard = coloured(dry, lambda f: read(MIC_RESPONSE, f))
    band_limit = signal.firwin(511, MIC_EDGE_HZ, window=("kaiser", 9), fs=SR)
    return signal.oaconvolve(heard, band_limit[None], "same")


dry = scene()
out = record(dry)
dump_mix(out)
```